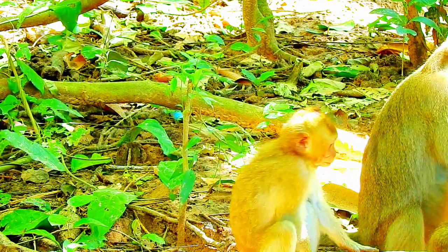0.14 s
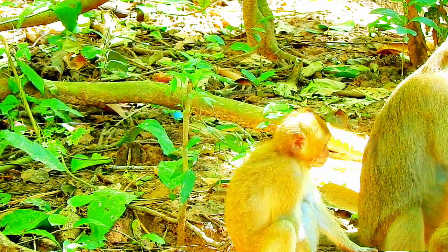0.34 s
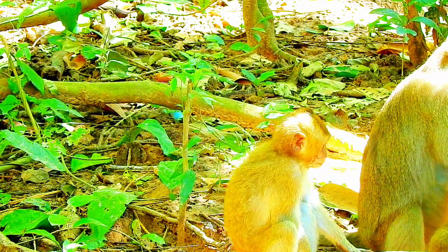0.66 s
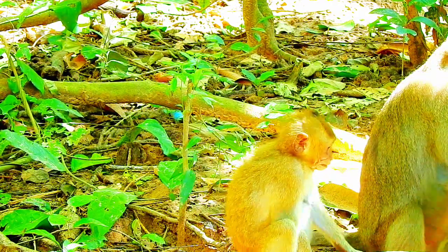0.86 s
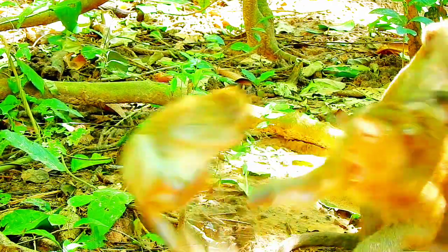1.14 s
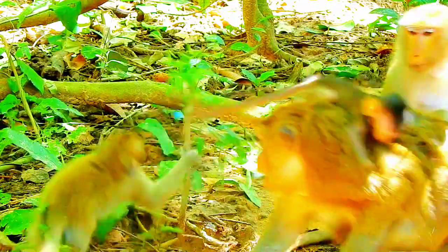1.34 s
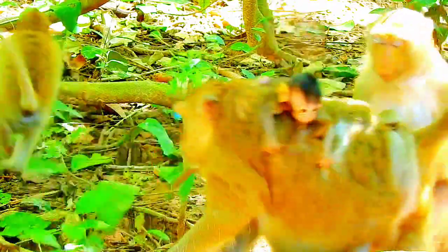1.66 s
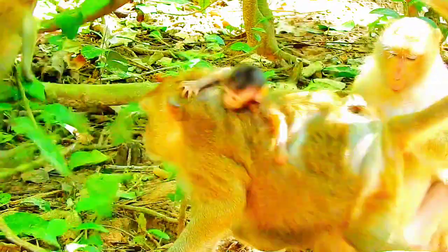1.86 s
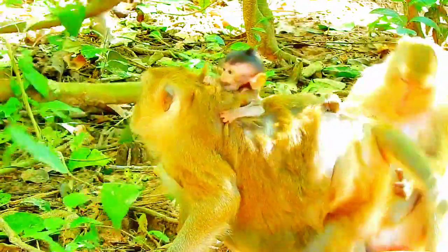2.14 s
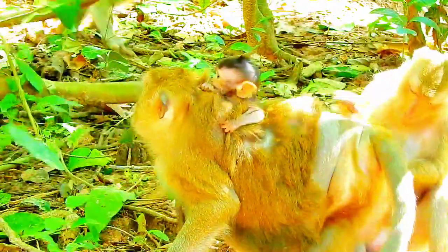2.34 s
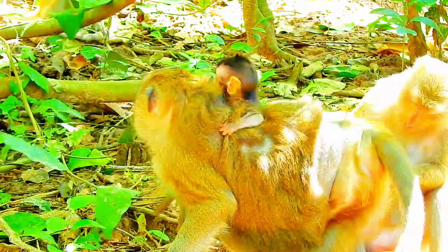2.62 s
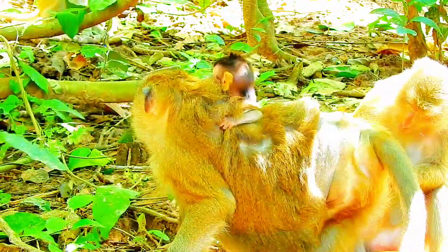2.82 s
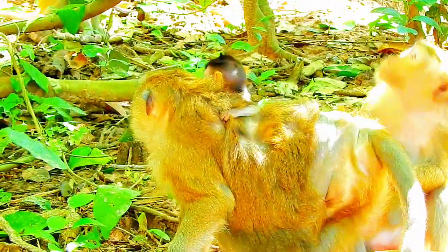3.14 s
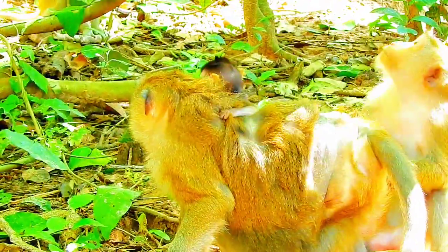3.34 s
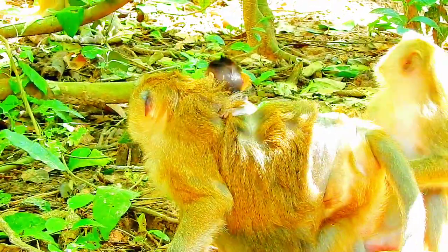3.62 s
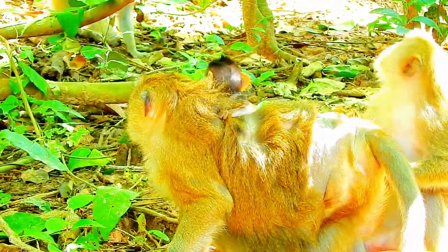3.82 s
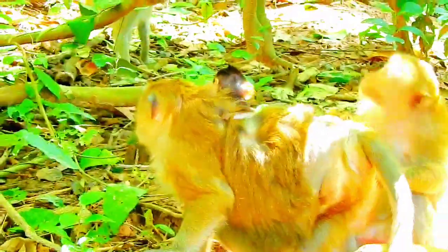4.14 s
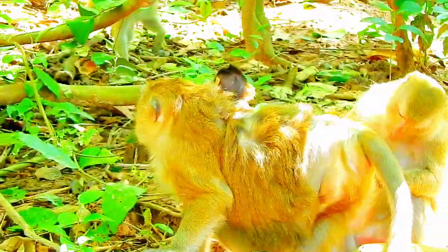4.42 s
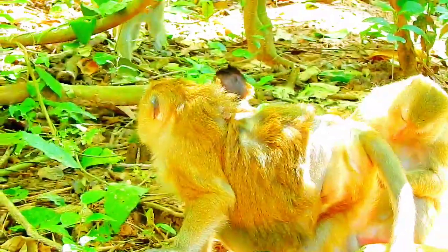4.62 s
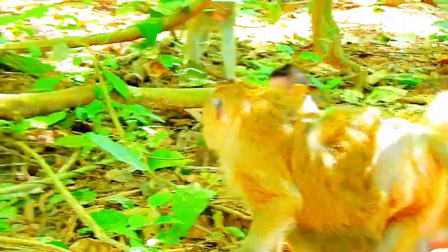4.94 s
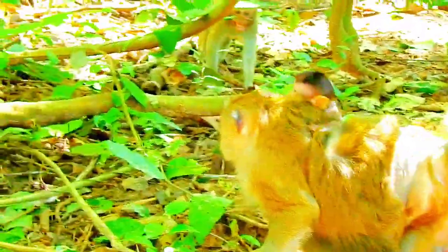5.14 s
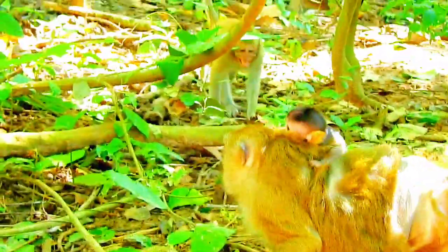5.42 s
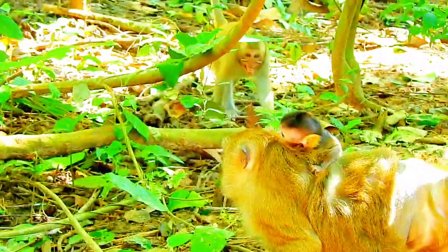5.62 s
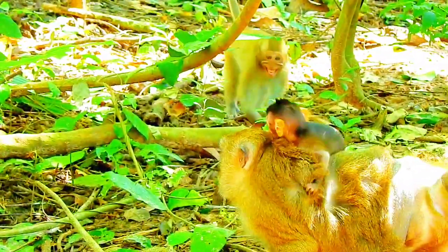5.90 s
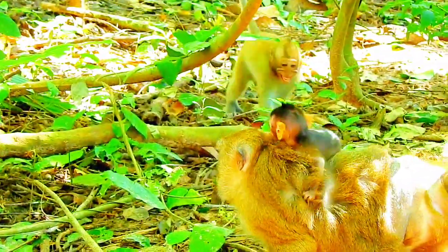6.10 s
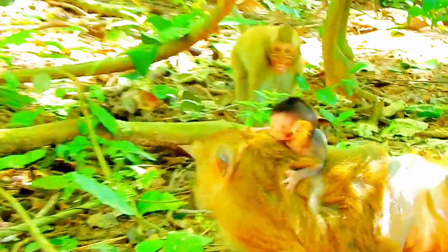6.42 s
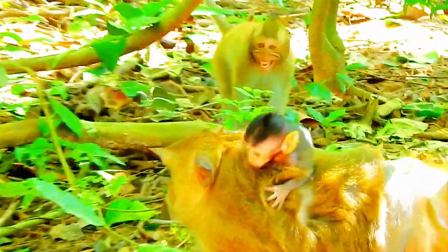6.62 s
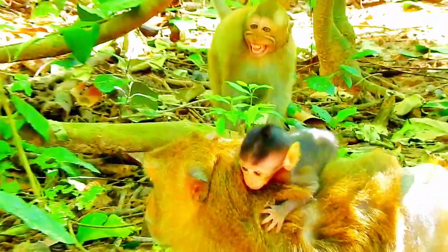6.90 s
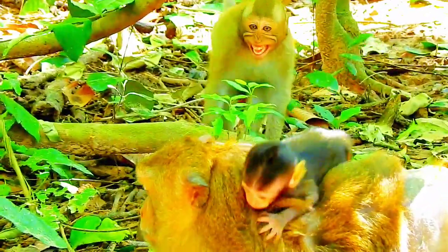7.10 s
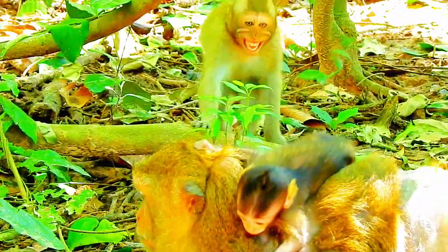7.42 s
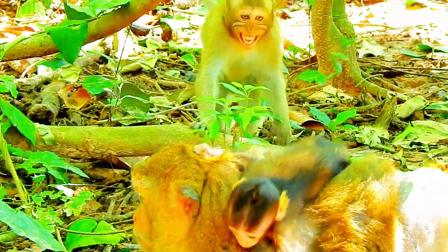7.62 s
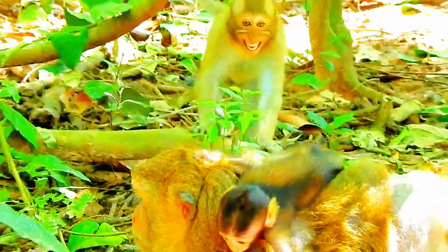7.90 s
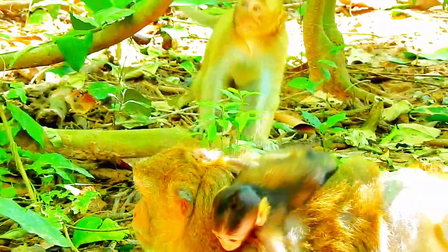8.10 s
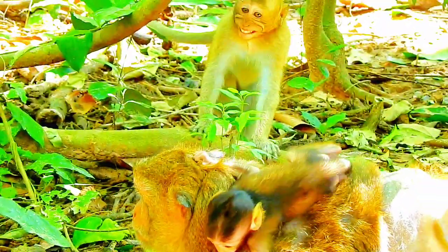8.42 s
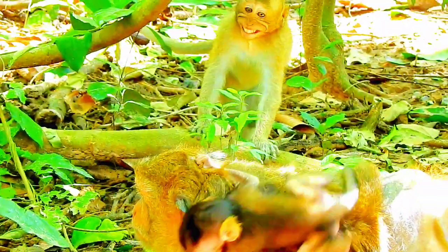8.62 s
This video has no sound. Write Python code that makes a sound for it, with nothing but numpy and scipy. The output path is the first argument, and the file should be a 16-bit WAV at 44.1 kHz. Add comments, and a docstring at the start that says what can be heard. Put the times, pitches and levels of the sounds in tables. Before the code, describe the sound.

Sharp, high monkey squeals come in short bursts, some turning raspy, with forest echoes, a low engine hum, faint bird twitter and small close knocks.

```python
"""A hiss of insects and foliage, a distant idling engine and a bird's twitter are heard first.
A young macaque then squeals: a phase oscillator gives arched whistles near 5 kHz, and under strain
irregular pulses and noise, filtered by throat resonances, turn them into harsh screams.
Filtered noise makes the hiss and rustling dry leaves; decaying bursts and ticks make close knocks, bumps and a motor.
A ground reflection and decaying random echoes scatter the calls and the twitter."""
import sys
import numpy as np
from scipy import signal
from scipy.fft import rfft, irfft, next_fast_len
from scipy.io import wavfile
from scipy.ndimage import uniform_filter1d

SR = 44100
rng = np.random.default_rng(int(sys.argv[2]) if len(sys.argv) > 2 else 0)


def generate_wav(sig):
    """Save sig (samples, or channels by samples) to the path in sys.argv[1] as 16-bit PCM at SR."""
    pcm = np.round(np.clip(np.atleast_2d(sig).T, -1, 1) * 32767).astype(np.int16)
    wavfile.write(sys.argv[1], SR, pcm)


N = 385875
TIME = np.arange(N) / SR  # s

# All levels are relative ones, before each source's final gain.
# spectral density of forest air and insects: (f/Hz, level/dB per Hz)
AIR_SPECTRUM = [(240, -21), (400, -0.5), (690, -0.5), (745, -4), (854, -2), (1210, -3.5), (1450, -3.5),
                (1720, -6.5), (2060, -7), (2390, -8), (3660, -10), (4010, -7.5), (6220, -7.5), (9660, -34),
                (15000, -44)]
# level of the hiss: (t/s, level/dB)
HISS_LEVEL = [(0, -47), (1.8, -45.5), (4.3, -49.5), (8.75, -50.5)]

# firing rate of the idling engine: (t/s, f/Hz)
FIRING_RATE = [(0, 19.4), (1.7, 19.5), (2.7, 20.65), (3.55, 20.7), (4.1, 19), (4.7, 18.6), (6.5, 18.6),
               (8.75, 18.3)]
# spectral density of the exhaust heard from afar: (f/Hz, level/dB per Hz)
EXHAUST_SPECTRUM = [(22, -35), (40, -16.5), (54, -6.5), (68, -9), (90, 2.5), (110, 3.5), (135, 1),
                    (160, 0.5), (190, -8.5), (250, -17.5), (310, -20), (400, -24.5), (600, -47),
                    (1200, -77)]
IDLE_HZ = 19
# level at idle, then gain of the whole and of the upper band for each extra firing per second
ENGINE_DB, LOUDER_DB_PER_HZ, BRIGHTER_DB_PER_HZ = -36, 2.24, 2

# bouts of twitter, each growing to its last note: (end t/s, level/dB)
TWITTER_BOUTS = [(.349, -46), (4.6, -48.5), (8.402, -45.5)]
CRESCENDO_DB_PER_S = 39

# feet scuffling in dry leaves: (t/s, half length/s, level/dB)
LEAF_SCUFFLES = [(1.3, 0.25, -45), (1.835, 0.2, -47), (4.057, 0.16, -57), (7.993, 0.086, -53.5)]
# leaves and twigs that snap: (t/s, level/dB, t60/s)
LEAF_SNAPS = [(1.699, -43, .03), (1.739, -33.5, 0.042), (1.923, -38, 0.035), (2.296, -21.5, 0.021),
              (3.679, -31.5, .04), (6.5971, -22, 0.03), (6.602, -28, 0.013), (8.175, -51, 0.094)]
STIR_DB = -57.5  # leaves stirring all the time

# knocks nearby: (t/s, level/dB, t60/s)
CASING_KNOCKS = [(3.668, -34, 0.019), (4.129, -55, 0.054), (4.209, -47, .08), (6.228, -45, 0.042),
                 (6.585, -30, 0.06), (6.589, -31, 0.034), (6.5907, -16, 0.0093), (7.85, -41.5, 0.077),
                 (7.926, -46, 0.034), (8.171, -50, .05)]
# resonances of the knocked casing: (f/Hz, filter width/Hz, level/dB)
CASING_MODES = [(462, 240, -2.5), (1095, 360, 4), (1540, 430, 2.5), (1876, 200, 0), (2330, 200, -1.5),
                (3700, 340, -8.5)]
# dull bumps: (t/s, level/dB, ring f/Hz, t60/s)
DULL_BUMPS = [(3.904, -29, 184, 0.088), (3.958, -30.5, 42.4, 0.65), (4.213, -33, 190, 0.073),
              (6.236, -29, 58, 0.31), (6.95, -39, 40.6, 0.45), (7.846, -30, 205.6, 0.21),
              (7.924, -27, 47.3, 0.39), (8.175, -34.5, 206, 0.15)]
# resonances of the small motor: (f/Hz, filter width/Hz, level/dB)
MOTOR_MODES = [(570, 75, -2), (866, 118, 1), (1110, 380, -7)]
# spurts of the small motor: (start t/s, length/s, level/dB)
MOTOR_SPURTS = [(3.872, 0.42, -51), (6.205, 0.82, -49), (7.815, 0.17, -49.5), (8.147, 0.055, -42)]
SPIN_UP_S = 0.02

# share of forest echo, larger when the caller is far or turned away: (t/s, level/dB)
ECHO_SHARE = [(1.1, 9), (1.25, 2), (3.8, 1.5), (5, 3), (6.7, 2), (7.45, 8)]
# side part of the echoes, wider in the treble: (f/Hz, level/dB)
ECHO_SIDE = [(4000, -3.5), (5500, 0.5), (7500, 3), (10000, 7), (15000, 2)]

# throat resonances: (f/Hz, filter width/Hz, level/dB)
THROAT_MODES = [(3850, 320, -1), (4600, 1260, 10.5), (6360, 1440, 4.5), (7170, 1600, -1.5),
                (10070, 3200, -19)]
# overtones of the whistle: (multiple of the pitch, level/dB)
WHISTLE_OVERTONES = [(2, -17.5), (3, -20.5)]
# lines that period doubling adds: (multiple of the pitch, level/dB)
DOUBLING_LINES = [(1.5, -9.5), (2.5, -18)]
# what the mouth lets out of the whistle: (f/Hz, level/dB)
MOUTH_RESPONSE = [(2600, 12), (3400, -7), (6000, -0.5), (7500, -2.5), (9300, -5), (10500, -11),
                  (12000, -24.5), (15000, -42)]
# whistled notes; each slides to a turning point, then drifts, and may drop away at the end:
# (start t/s, length/s, slide/s, start f/Hz, turn f/Hz, end f/Hz, final drop/octaves,
#  level/dB, roughness/0-1, overtone level/dB)
WHISTLE_NOTES = [ (0.989, 0.13, 0.048, 5710, 5572, 5510, 0.023, -28.5, 0.05, -8),
                 (1.108, 0.043, 0.016, 4640, 4730, 5470, 0, -25.5, 0.13, 0),
                 (1.161, .011, 0.0087, 3304, 3610, 3660, 0.027, -14, 0.05, -2),
                 (2.337, 0.029, 0.0064, 5846, 5760, 4690, 0.015, -20.5, 0.56, 11),
                 (2.364, 0.029, 0.009, 4400, 3974, 3497, 0.0073, -11, 0.21, 6.5),
                 (2.393, .048, 0.012, 3576, 3442, 3620, 0, -13, 0.09, 6.5),
                 (2.443, .037, 0.0071, 4013, 4060, 3830, 0.0055, -13, 0.38, 6.5),
                 (2.888, .031, 0.0045, 4930, 4990, 5120, 0.045, -23, 0.1, 6),
                 (3.388, .016, 0.01, 5180, 5250, 5505, 0.03, -22.5, 0.11, -1),
                 (3.526, 0.049, 0.0029, 4880, 4754, 4576, 0.0041, -18, 0.15, 5.5),
                 (3.571, 0.041, .022, 4684, 5096, 4970, 0.0046, -19.5, 0.16, 1),
                 (3.762, 0.045, .036, 5140, 5543, 5490, 0.0081, -14.5, .02, -.5),
                 (3.803, 0.029, .004, 5230, 5158, 5370, 0.04, -15, 0, 1),
                 (4.65, 0.017, 0.0074, 5200, 5360, 5550, 0, -33.5, 0.13, -7),
                 (4.684, 0.093, 0.022, 5220, 4913, 5130, 0.047, -22, 0.06, 4),
                 (4.776, 0.039, 0.019, 5230, 5400, 5315, 0.089, -18, .05, -2),
                 (4.998, 0.046, .015, 5400, 6066, 5710, 0.097, -20.5, 0.1, 12),
                 (5.049, .061, .004, 5650, 5276, 4986, 0, -19, .22, 6),
                 (5.11, .098, .008, 4970, 4766, 4380, 0, -18, 0.13, 10),
                 (5.204, .065, 0.0024, 4960, 5160, 4905, .36, -22.5, 0.12, -5),
                 (5.458, 0.097, 0.032, 5230, 5285, 5175, 0.066, -25.5, 0.14, 9.5),
                 (5.523, 0.091, 0.02, 5150, 4707, 4390, 0.36, -18.5, 0.13, 9),
                 (5.99, 0.11, 0.011, 4990, 4970, 4820, .5, -27.5, 0, 3.5),
                 (6.455, 0.034, 0.017, 5020, 4986, 4870, 0.01, -28.5, 0.17, 3),
                 (6.735, 0.11, 0.033, 5050, 5600, 5520, 0.024, -17, 0.08, 1.5),
                 (6.844, 0.07, 0.0037, 5630, 5560, 4670, 0.16, -18.5, 0.1, -1.5),
                 (7.366, 0.049, 0.039, 5250, 6105, 5960, 0, -19.5, .08, 1),
                 (7.413, 0.093, 0.0039, 5600, 5774, 5420, 0.4, -21.5, 0.1, -1.5)]
# harsh screams, with the same slide and drift; roughness above 1 is later limited to 1:
# (start t/s, length/s, slide/s, start f/Hz, turn f/Hz, end f/Hz, release/s, level/dB, roughness,
#  upper throat level/dB, overtone level/dB, period doubling level/dB)
SCREAM_NOTES = [ (1.167, 0.093, 0.0036, 3500, 3650, 4154, .075, -15.5, 1.2, 21.5, 3, 8),
                (2.188, 0.16, 0.04, 4770, 4113, 4323, 0.077, -19, 0.88, 10.5, 11.5, 6),
                (2.483, 0.081, 0.0095, 3955, 4453, 4843, .004, -18, 0.97, 5, 8, 10.5),
                (2.557, .21, .003, 4460, 4566, 4400, 0.038, -16, 0.76, 3.5, 1, 0.5),
                (2.917, .339, .055, 5177, 5085, 4742, 0.093, -17.5, 0.8, 8.5, 5.5, -2),
                (3.404, .124, .005, 5360, 5480, 4828, 0.0038, -20.5, 0.78, 8.5, 2, -19)]
# moments when the voice briefly breaks into another regime:
# (t/s, half length/s, roughness/0-1, period doubling level/dB)
VOICE_BREAKS = [(2.563, 0.0079, 0.52, 18), (3.803, 0.0069, 0.24, -23), (4.703, 0.021, .44, 6),
                (5.55, 0.027, 0.4, 9), (6.097, 0.0089, 0.38, -12), (7.409, 0.0087, 0.3, -8)]
# every note swells while its pitch slides, and fades at its end
ONSET_DB, SWELL_MAX_S = -13, 0.066
WHISTLE_RELEASE_S, WHISTLE_FADE_DB, DROP_S = 0.022, -5, 0.014
WHISTLE_DOUBLING_DB, WHISTLE_UPPER_DB = -8.5, 13
# a scream is cleaner, by these shares, while pressure builds and while it ebbs
SCREAM_FADE_DB, CLEAN_ONSET, CLEAN_RELEASE = -15, 0.722, .25

TOP_HZ = 15300  # upper limit of the sound's band


def undb(db):
    """Amplitude ratio: 20 dB correspond to a factor of ten."""
    return 10 ** (np.asarray(db) / 20)


def unit(x):
    """Normalization to a root-mean-square value of 1."""
    return x / np.sqrt(np.mean(x ** 2))


def curves(rows):
    """Linear interpolation in time of each column of a table."""
    s, *columns = np.transpose(rows)
    return [np.interp(TIME, s, c) for c in columns]


def noise():
    """White noise: equal power at all frequencies."""
    return rng.standard_normal(N)


def walk(rate):
    """Random modulation: straight lines join rate random values per second, with a spread near 1."""
    steps = rng.standard_normal(N)
    return 1.25 * np.interp(TIME * rate, np.arange(N), steps)


def band(x, hz, width_hz):
    """Resonance: a peak filter applied twice for steep skirts."""
    b, a = signal.iirpeak(min(hz, .45 * SR), hz / width_hz, fs=SR)
    once = signal.lfilter(b, a, x)
    return signal.lfilter(b, a, once)


def colour(x, points):
    """Linear filtering by a response drawn through (f/Hz, level/dB) points on a log frequency axis."""
    hz, db = np.transpose(points)
    size = next_fast_len(N + 4096)
    f = np.maximum(np.arange(size // 2 + 1) * SR / size, 1)
    response = undb(np.interp(np.log(f), np.log(hz), db))
    return irfft(rfft(x, size) * response, size)[..., :N]


def pan(x, left_db):
    """Interaural level difference: left exceeds right by left_db."""
    return x * undb(np.array([[left_db], [-left_db]]) / 2)


def spread(make, side_db, left_db):
    """Partial decorrelation: two draws of a random sound serve as middle and side."""
    middle = make()
    side = undb(side_db) * make()
    return pan(middle + side * np.array([[1], [-1]]), left_db)


def fade(t60):
    """Exponential decay, 60 dB in t60 seconds, with its own time axis."""
    t = np.arange(SR // 2) / SR
    return t, undb(-60 * t / t60)


def add(out, s, x):
    """Superposition: mix a short sound in at time s."""
    i = int(s * SR)
    out[i:i + len(x)] += x[:N - i]


def pulses(rate):
    """Phase accumulation: a unit impulse at each completed cycle of the rate in Hz."""
    cycles = np.cumsum(rate) / SR
    return np.diff(np.floor(cycles), prepend=0)


def ramp(t, length):
    """Linear fall from 1 to 0 over the given length."""
    return np.clip(1 - t / max(length, 1e-4), 0, 1)


def swell(s, half_s):
    """Gaussian envelope centred on time s."""
    return np.exp(-((TIME - s) / half_s) ** 2)


def air():
    """Broadband noise: many foliage and insect sounds merge into a gently fluctuating hiss."""
    db, = curves(HISS_LEVEL)
    hiss = spread(lambda: unit(colour(noise(), AIR_SPECTRUM)) * undb(.5 * walk(8.2)),
                  side_db=-12.5, left_db=1.8)
    return hiss * undb(db)


def engine(scatter_db=2.5, rumble_db=-3, smear_t60=0.1685):
    """Pulse excitation and multipath: firings thump the exhaust, and distance blurs them into a rumble."""
    hz, = curves(FIRING_RATE)
    extra_hz = hz - IDLE_HZ
    firings = pulses(hz) * undb(scatter_db * walk(20))
    # many paths smear each thump in time without colouring it
    t, ring = fade(smear_t60)
    paths = rfft(ring * rng.standard_normal(len(t)))
    smear = np.roll(irfft(paths / np.abs(paths)), SR // 10)
    thumps = signal.fftconvolve(firings, smear)[SR // 10:][:N]
    rumble = spread(lambda: unit(colour(noise(), EXHAUST_SPECTRUM)), side_db=-37, left_db=4.5)
    hum = unit(unit(colour(thumps, EXHAUST_SPECTRUM)) + undb(rumble_db) * rumble)
    # faster firing is louder and brighter
    lows = colour(hum, [(140, 3.0), (220, -14.0), (400, -58)])
    brightened = lows + (hum - lows) * undb(BRIGHTER_DB_PER_HZ * extra_hz)
    return brightened * undb(ENGINE_DB + LOUDER_DB_PER_HZ * extra_hz)


def bird(top_hz=5100, fall_hz=800, pairs_hz=22.9):
    """Frequency modulation: pairs of short falling tones repeat rapidly in a crescendo."""
    out = np.zeros(N)
    for end, db in TWITTER_BOUTS:
        before = np.minimum(TIME - end, 0)
        # of every three slots, two carry a note and one is silent
        slot, within = np.divmod(before * pairs_hz * 3, 1)
        notes = (slot % 3 > 0) * np.sin(np.pi * within) ** 2
        phase = 2 * np.pi * np.cumsum(top_hz - fall_hz * within) / SR
        out += notes * undb(db + CRESCENDO_DB_PER_S * before) * np.sin(phase)
    return 2 * out


def leaves():
    """Stochastic impact noise: moving leaves crackle densely, and single snaps decay."""
    scuffles = sum(undb(db) * swell(s, half_s) for s, half_s, db in LEAF_SCUFFLES)
    force = (undb(STIR_DB) + scuffles) * undb(1.5 * walk(60))
    for s, db, t60 in LEAF_SNAPS:
        add(force, s, undb(db) * fade(t60)[1])
    crackle = spread(lambda: unit(band(noise() * undb(1.4 * walk(1500)), 6840, 2850)),
                     side_db=-0.5, left_db=0)
    return colour(force * crackle, [(1500, 11), (4000, 10), (9000, -6.0), (15000, -7.0)])


def casing_knocks():
    """Modal excitation: decaying noise bursts ring the resonances of a casing."""
    blows = np.zeros(N)
    for s, db, t60 in CASING_KNOCKS:
        t, ring = fade(t60)
        add(blows, s, undb(db) * ring * rng.standard_normal(len(t)))
    return undb(17.5) * sum(undb(db) * band(blows, hz, width) for hz, width, db in CASING_MODES)


def dull_bumps():
    """Damped oscillation: each bump is one decaying low sine."""
    bumps = np.zeros(N)
    for s, db, hz, t60 in DULL_BUMPS:
        t, ring = fade(t60)
        add(bumps, s, undb(db) * ring * np.sin(2 * np.pi * hz * t))
    return bumps


def small_motor(turn_hz=42, grit=0.065):
    """Forced resonance: a gear's tick once a turn, with some noise, drives the motor's modes."""
    ticks = pulses(turn_hz * (1 + 0.039 * walk(30)))
    drive = ticks + grit * noise() / 2
    running = np.zeros(N)
    for s, length, db in MOTOR_SPURTS:
        edge_s = np.minimum(TIME - s, s + length - TIME)
        running += undb(db) * np.clip(edge_s / SPIN_UP_S, 0, 1)
    return unit(sum(undb(db) * band(drive, hz, width) for hz, width, db in MOTOR_MODES)) * running


def handling():
    """Superposition of the close sounds, all placed towards the left."""
    return pan(casing_knocks() + small_motor(), left_db=5.5) + pan(dull_bumps(), left_db=10.5)


def forest(x, ground_db=-9, ground_s=.0021, near_db=-8, near_t60=0.2, far_db=-12, far_t60=0.74, width=0.54):
    """Reflection and scattering: a ground bounce, quick echoes from stems and a long tail from trunks."""
    t = np.arange(SR) / SR
    responses = []
    for _ in range(2):
        # cubed noise gives sparse strong echoes
        stems = rng.standard_normal(SR) ** 3 * undb(-60 * t / near_t60) * (t > .003)
        trunks = rng.standard_normal(SR) * undb(-60 * t / far_t60) * np.minimum(t / .03, 1)
        responses.append((undb(near_db) * unit(stems) + undb(far_db) * unit(trunks)) / np.sqrt(SR))
    middle, side = responses
    side = colour(side, ECHO_SIDE)[:SR]
    stereo = middle + width * side * np.array([[1], [-1]])
    share_db, = curves(ECHO_SHARE)
    # the echoes are slightly duller around 10 kHz
    sent = colour(x * undb(share_db), [(5000, 0.13), (10000, -3), (15000, 0)])
    echoes = signal.fftconvolve(sent[None], stereo, axes=1)[:, :N]
    bounce = undb(ground_db) * np.roll(x, int(ground_s * SR))
    return x + bounce + echoes


def note(start, length, slide, start_hz, turn_hz, end_hz):
    """Pitch contour of one note: an easing slide, then a straight drift; also its samples and own time."""
    span = slice(int(start * SR), int((start + length) * SR))
    t = TIME[span] - TIME[span][0]
    drift = np.interp(t, [slide, length], [turn_hz, end_hz])
    return span, t, drift + (start_hz - turn_hz) * ramp(t, slide) ** 2


def voice():
    """Source control: pitch, gain, roughness and throat setting through all whistles and screams."""
    hz = np.full(N, 5000.)
    gain, rough, overtone_db = np.zeros((3, N))
    upper_db = np.zeros(N) + WHISTLE_UPPER_DB
    doubling_db = np.zeros(N) + WHISTLE_DOUBLING_DB
    for *contour, drop, db, roughness, overtones in WHISTLE_NOTES:
        span, t, pitch = note(*contour)
        length, slide = contour[1:3]
        hz[span] = pitch * 2 ** (-drop * ramp(length - t, DROP_S))
        onset_db = ONSET_DB * ramp(t, min(slide, SWELL_MAX_S))
        fade_db = WHISTLE_FADE_DB * ramp(length - t, WHISTLE_RELEASE_S)
        gain[span] = undb(db + onset_db + fade_db)
        rough[span], overtone_db[span] = roughness, overtones
    for *contour, release, db, roughness, upper, overtones, doubling in SCREAM_NOTES:
        span, t, pitch = note(*contour)
        length, slide = contour[1:3]
        building, ebbing = ramp(t, slide), ramp(length - t, release)
        gain[span] = undb(db + ONSET_DB * building + SCREAM_FADE_DB * ebbing)
        rough[span] = roughness * (1 - CLEAN_ONSET * building - CLEAN_RELEASE * ebbing)
        hz[span], upper_db[span] = pitch, upper
        overtone_db[span], doubling_db[span] = overtones, doubling
    for s, half_s, roughness, doubling in VOICE_BREAKS:
        share = swell(s, half_s)
        rough += share * (roughness - rough)
        doubling_db += share * (doubling - doubling_db)
    # breath and throat take a moment (3 ms) to move from one note to the next
    settings = (gain, rough, upper_db, overtone_db, doubling_db)
    return hz, *(uniform_filter1d(c, size=132) for c in settings)


def rasp(hz, upper_db, hiss_db=-5, shake_db=-1.3, patchy_db=2.9, lurch=.06, stumble=.03):
    """Source and filter: folds closing about every fourth cycle, irregularly, and hiss ring the throat."""
    drift = lurch * walk(110)
    out = 0
    for f, width, db in THROAT_MODES:
        closures = pulses(hz / 4 * (1 + drift + stumble * walk(900)))
        drive = unit(closures) + undb(hiss_db) * noise()
        # the upper setting lifts resonances above 4800 Hz and lowers those below
        opening_db = upper_db * np.clip(2 * np.log2(f / 4800), -1, 1)
        # each resonance swells and sinks on its own
        out = out + undb(db + opening_db + patchy_db * walk(120)) * band(drive, f, width)
    out = colour(out, [(2600, -21), (3100, -6.5), (3500, -1), (8000, -1.5), (13000, -1.0), (16000, -5)])
    running_rms = np.sqrt(uniform_filter1d(out ** 2, size=400))
    return out / running_rms * undb(shake_db * walk(400))


def monkey(waver=.005, ripple=.004, jitter=.035, wobble=.022, flutter_db=0.3, rough_flutter_db=2, chaos_power=1.43):
    """Nonlinear vocal folds: clean whistles give way under strain to period doubling and chaos."""
    hz, gain, rough, upper_db, overtone_db, doubling_db = voice()
    rough = np.clip(rough, 0, 1)
    # strain makes the pitch lurch and shake
    strain = rough * (wobble * walk(200) + jitter * rough * walk(1100))
    unsteady = waver * walk(170) + ripple * walk(55) + strain
    phase = 2 * np.pi * np.cumsum(hz * (1 + unsteady)) / SR
    overtones = sum(undb(db + overtone_db) * np.sin(k * phase) for k, db in WHISTLE_OVERTONES)
    halves = sum(undb(db + doubling_db) * np.sin(k * phase) for k, db in DOUBLING_LINES)
    whistle = np.sqrt(2) * colour(np.sin(phase) + overtones + rough * halves, MOUTH_RESPONSE)
    whistle *= undb((flutter_db + rough_flutter_db * rough) * walk(160))
    # crossfade at constant power from whistle to rasp
    chaos = .95 * rough ** chaos_power
    sound = gain * (np.sqrt(1 - chaos ** 2) * whistle + chaos * rasp(hz, upper_db))
    # a gentle low cut keeps the joins between notes free of clicks
    return colour(sound, [(2000, -9), (3200, 0)])


def scene():
    """Superposition of everything heard from one spot among the trees."""
    twitter = bird()
    calls = forest(monkey() * undb(-1.5) + twitter * undb(-10)) + twitter * undb(-2)
    return air() + engine() + leaves() + handling() + pan(calls, left_db=1.5)


def record(dry):
    """Band limitation: a steep low-pass ends the sound above 15.3 kHz."""
    top_cut = signal.ellip(8, .2, 70, TOP_HZ, fs=SR, output="sos")
    return signal.sosfilt(top_cut, dry)


dry = scene()
out = record(dry)
generate_wav(out)
```